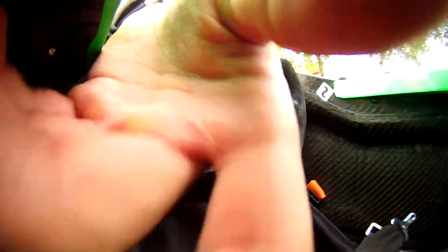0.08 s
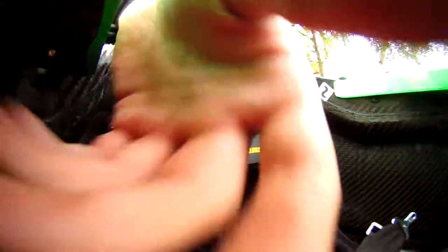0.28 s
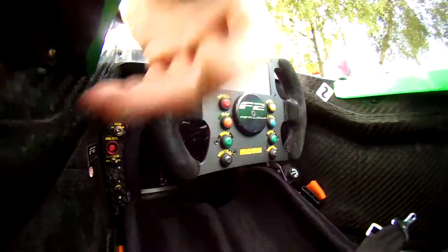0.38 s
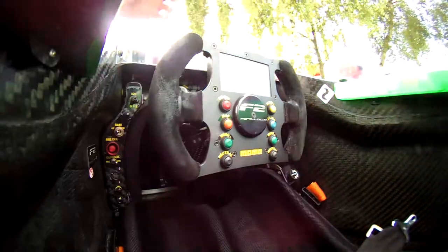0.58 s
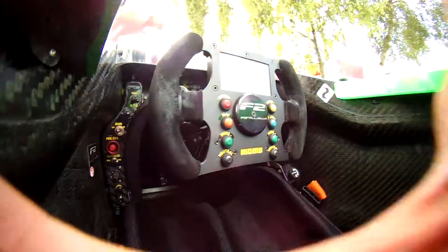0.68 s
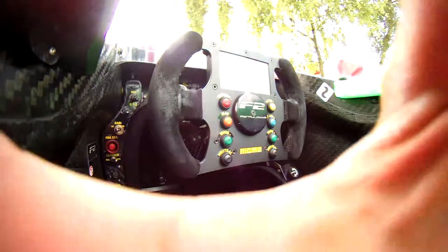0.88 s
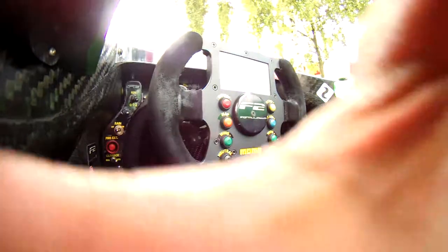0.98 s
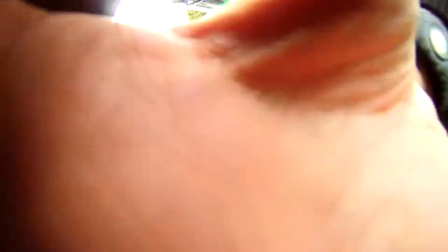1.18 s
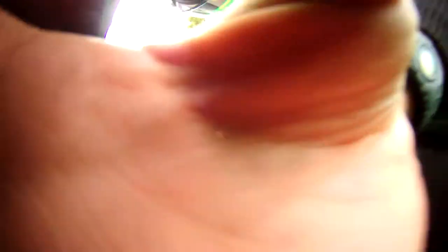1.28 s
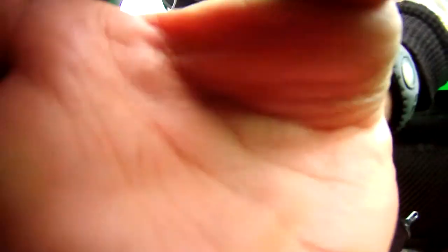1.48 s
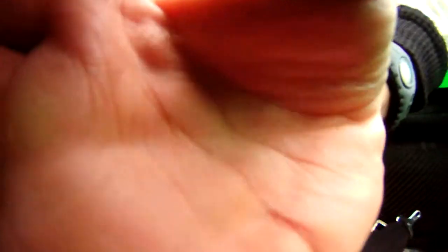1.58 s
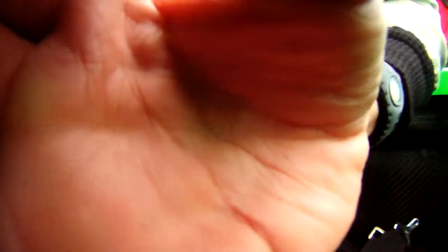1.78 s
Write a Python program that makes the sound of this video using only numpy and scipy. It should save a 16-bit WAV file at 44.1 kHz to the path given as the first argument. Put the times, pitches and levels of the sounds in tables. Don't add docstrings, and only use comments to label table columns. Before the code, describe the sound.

Close handling noise on a plastic camera case, with a deep bump, a loud clipped knock with gritty dragging, and smaller clicks and faint rubs, while an engine drones low and uneven, the microphone shut inside the case.

```python
import sys
import numpy as np
from scipy import signal
from scipy.fft import rfft, irfft
from scipy.io import wavfile
from scipy.ndimage import uniform_filter1d

SR = 44100
rng = np.random.default_rng(int(sys.argv[2]) if len(sys.argv) > 2 else 0)


def int16_out(signal):
    q = np.round(np.clip(np.atleast_2d(signal).T, -1, 1) * 32767)
    wavfile.write(sys.argv[1], SR, q.astype(np.int16))


def nominal_scale(level):
    x = np.asarray(level, float) / 20
    return 10 ** x


N = 79380

# centre [Hz], width [Hz], level [dB].
CASE_MODES = [(437, 180, -12), (1013, 362, -7), (1360, 251, 3.5), (1930, 608, -3.5), (3290, 600, -16),
              (4300, 460, -17.5)]


def level(x, db):
    return x * nominal_scale(db) / np.sqrt(np.mean(x ** 2))


def band(x, hz, width_hz):
    return signal.lfilter(*signal.iirpeak(min(hz, 0.45 * SR), hz / width_hz, fs=SR), x)


def body(x, modes):
    out = 0
    for k, (hz, width_hz, db) in enumerate(modes):
        out = out + (-1) ** k * nominal_scale(db) * band(x, hz, width_hz)
    return out


def wall(x):
    return signal.sosfilt(signal.butter(6, 5100, fs=SR, output="sos"), x)


def curve(table, axis):
    rows = np.array(table)
    return np.interp(np.arange(N) / SR, rows[:, 0], rows[:, axis])


def walk(rate_hz):
    hold = int(SR / rate_hz)
    steps = np.repeat(rng.standard_normal(N // 50), hold)[:N]
    return 1.383 * uniform_filter1d(uniform_filter1d(steps, hold), hold)


def grains(rate_hz, spread_db):
    chance, side, size = rng.random((3, N))
    return (chance < rate_hz / SR) * np.sign(side - 0.5) * nominal_scale(-spread_db * np.log(size + 0.04))


def engine():
    # time [s], firing rate [Hz], drone level [dB], clatter level [dB].
    idle = [
        (0.0, 48.74, -24.5, -41),
        (0.08, 46.64, -32.5, -41.5),
        (0.32, 44.95, -29, -42.5),
        (0.39, 45.05, -30, -40.5),
        (0.826, 48.48, -34, -40.5),
        (1.002, 47.61, -31.5, -40),
        (1.212, 44.81, -32.5, -42),
        (1.504, 46.59, -31, -40),
        (1.594, 48.65, -31.5, -38.5),
        (1.8, 49.46, -31.5, -39),
    ]
    # centre [Hz], width [Hz], level [dB].
    exhaust_modes = [(44.4, 23, 3.5), (102.5, 29, -5.5), (141.6, 15, -3.5), (195, 44, -11),
                     (278.6, 17.3, -5.5), (323, 17.7, -12)]
    phase = np.cumsum(curve(idle, axis=1) * (1 + 0.01967 * walk(25))) / SR
    firing = phase.astype(int)
    strength = nominal_scale(2.4 * rng.standard_normal(200))[firing]
    pulses = np.diff(firing, prepend=0) * strength
    drone = level(body(pulses, exhaust_modes), 0)
    drone = signal.sosfilt(signal.butter(4, 340, fs=SR, output="sos"), drone)

    gate = 0.59 + 0.82 * np.exp(-(phase % 1) / 0.9)
    rattle = rng.standard_normal(N) + 2.4 * grains(1000, 2.5)
    clatter = wall(body(gate * nominal_scale(0.75 * walk(7.1)) * rattle, CASE_MODES))
    clatter = level(clatter * nominal_scale(curve(idle, axis=3)), -40.5)
    return nominal_scale(curve(idle, axis=2)) * drone + clatter


def rumble():
    # frequency [Hz], density [dB per Hz].
    spectrum = np.array([(20, -1.5), (45, 6), (75, -15), (110, 0), (150, 3), (226, -9.5), (295, -5.5),
                         (420, -21), (800, -21)])
    hz = np.fft.rfftfreq(N, 1 / SR) + 1
    gain_db = np.interp(np.log(hz), np.log(spectrum[:, 0]), spectrum[:, 1], right=-99)
    noise = irfft(rfft(rng.standard_normal(N)) * nominal_scale(gain_db), N)
    return level(noise * nominal_scale(2 * walk(5)), -36.5)


def hiss():
    wide = level(band(rng.standard_normal(N), 8200, 20000), -79)
    hump = level(band(rng.standard_normal(N), 6900, 2500), -78.5)
    return wide + hump


def hand_shake():
    # time [s], level [dB].
    load = [(0.0, -12), (0.08, -67), (0.224, -35), (0.26, -13), (0.4, -36), (0.586, -64), (0.62, -20),
            (0.68, -46), (0.932, -63), (0.962, -21.5), (1.268, -28), (1.538, -19.5), (1.564, -22.5),
            (1.8, -30.5)]
    tremble = band(band(rng.standard_normal(N), 11, 30), 11, 30)
    return level(tremble, 0) * nominal_scale(curve(load, axis=1) - 4.5)


def pushes():
    # start [s], signed strength [full scale], length [s].
    shoves = [(0.236, -0.29, 0.0096), (0.2513, -1.48, .0152), (.303, -0.14, .015), (0.438, 0.14, 0.018),
              (0.612, 0.46, .014), (0.728, .08, 0.022), (.966, 0.19, 0.00968), (1.073, 0.11, 0.015),
              (1.337, 0.2, 0.035), (1.38, 0.032, 0.033), (1.42, -0.12, 0.019), (1.5153, 0.25, 0.022)]
    t, force = np.arange(N) / SR, np.zeros(N)
    for start, strength, length in shoves:
        progress = np.clip((t - start) / length, 0, 1)
        force += strength * np.sin(np.pi * progress ** 2.4) ** 2
    mount = band(force, 44.3, 85)
    return 0.987 * mount + 0.27 * band(force, 140, 260)


def rubs():
    # start [s], length [s], level [dB], pitch [Hz].
    strokes = [(0.24, 0.037, -65.5, 6000), (0.268, 0.018, -44.5, 2920), (0.348, 0.19, -62, 6500),
               (.39, .125, -74, 10600), (0.773, 0.108, -65.5, 6200), (0.889, 0.042, -58, 4900),
               (0.947, 0.057, -61, 5400), (1.028, 0.047, -57, 5100), (1.308, 0.083, -71, 5500),
               (1.493, 0.015, -49, 4300), (1.503, .011, -34.5, 2680), (1.52, 0.012, -82, 6800),
               (1.433, 0.006, -55, 3080)]
    t, out = np.arange(N) / SR, np.zeros(N)
    slip = (grains(4000, 3.0) + 0.6 * rng.standard_normal(N)) * nominal_scale(1.8 * walk(90))
    for start, length, db, hz in strokes:
        progress = np.clip((t - start) / length, 0, 1)
        scrape = band(band(slip, hz, 0.45 * hz), hz, 0.7 * hz)
        out += np.sin(np.pi * progress) ** 0.6 * level(scrape, db)
    return out


def ticks():
    # time [s], peak level [dB], pitch [Hz], contact time [s], edge level [dB].
    contacts = [(0.2578, -17.5, 767, 0.0014, -41), (0.4763, -28, 2800, 0.001, -38),
                (.6060, 2, 1710, .0005, -13.5), (0.6303, -6.5, 1660, 0.00067, -8.5),
                (0.6512, -17, 4300, 0.0025, -34), (0.6952, -17, 4300, 0.0014, -24),
                (.7432, -44, 3860, .0003, 2), (0.769, -23.5, 2780, .0012, -39),
                (0.8315, -28.5, 4200, 0.0013, -42), (0.8337, -20, 1320, 0.00062, -46),
                (.8345, -28, 400, 0.00076, -44), (.8355, -18.5, 900, 0.0012, -30),
                (.8384, -21, 1600, 0.00046, -11), (.867, -52, 4500, 0.00055, -5),
                (0.9021, -22, 1700, 0.0028, -32), (0.9102, -17.5, 1670, 0.0016, -39),
                (0.9131, -13.5, 1470, 0.0015, -25), (0.9157, -21.5, 3310, 0.0013, -46),
                (0.968, -33, 1000, 0.0023, -35), (1.029, -35, 640, 0.0021, -46),
                (1.0708, -22, 1810, 0.0015, -34), (1.3890, -11.5, 1890, 0.00031, -37),
                (1.3897, -16.5, 3000, 0.00097, -26.5), (1.5043, -26.5, 4170, 0.0022, -21)]
    length = 4096
    out, t = np.zeros(N + length), np.arange(length) / SR
    for at, db, hz, contact, edge_db in contacts:
        hit = rng.standard_normal(length) * t / contact * np.exp(-(t / contact) ** 2)
        spot = wall(band(band(hit, hz, 0.18 * hz), hz, 0.5 * hz))
        shell = wall(body(hit, CASE_MODES))
        edge = band(band(hit, 4700, 6000), 4700, 9000)
        tick = spot / abs(spot).max() + 0.48 * shell / abs(shell).max()
        tick = tick + nominal_scale(edge_db) * edge / abs(edge).max()
        start = int(at * SR)
        out[start:start + length] += nominal_scale(db) * tick
    return out[:N]


def drag():
    # time [s], level [dB], brightness [dB].
    path = [
        (.535, -72, -8),
        (.563, -28, -23),
        (.582, -22.5, -8.5),
        (.603, -8, -8.5),
        (.612, -9.5, -6),
        (.618, -19, 1),
        (.664, -28, 1),
        (.684, -21.5, -3.5),
        (.76, -49, 5.5),
    ]
    t = np.arange(N) / SR
    fade_in = np.clip((t - path[0][0]) / 0.012, 0, 1)
    fade_out = np.clip((path[-1][0] - t) / 0.014, 0, 1)
    slip = (grains(3000, 2.5) + 0.52 * rng.standard_normal(N)) * nominal_scale(2.3 * walk(119.05))
    fine = (grains(5500, 7.5) + 0.5 * rng.standard_normal(N)) * nominal_scale(0.87 * walk(200.3))
    press_db = curve(path, axis=1)

    shell = level(wall(body(slip, CASE_MODES)), 0)
    panels = level(body(slip, [(389, 120, -7.5), (1000, 390, -7.5), (297, 360, -13.5)]), -2)
    panels = panels * nominal_scale(0.48 * (press_db - press_db.max()))
    bright = level(wall(body(fine, [(4300, 1500, 27), (2800, 1000, -15)])), -8.5)
    top = level(band(band(fine, 7200, 2400), 6700, 3800), -22.5)
    air = level(band(fine, 9500, 9900), -32)
    scrape = shell + panels + nominal_scale(curve(path, axis=2)) * (bright + top + air)
    return fade_in * fade_out * nominal_scale(press_db) * scrape


def scene():
    outside = engine() + rumble() + hiss()
    hand = hand_shake() + pushes() + rubs() + ticks() + drag()
    return (outside + hand)[None]


def low_pass(x):
    return signal.sosfilt(signal.butter(12, 15940, fs=SR, output="sos"), x)


def record(dry):
    clipped = np.clip(dry, -0.68, 0.68)
    mix = signal.sosfilt(signal.ellip(8, 0.1, 60, 15900, fs=SR, output="sos"), clipped)
    return low_pass(mix)


dry = scene()
out = record(dry)
int16_out(out)
```